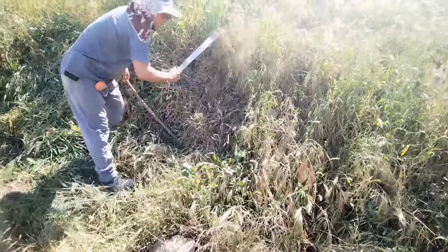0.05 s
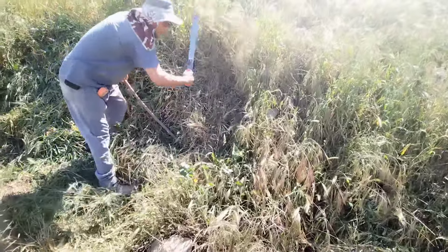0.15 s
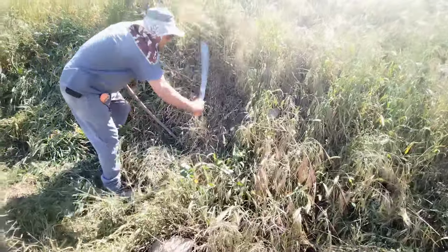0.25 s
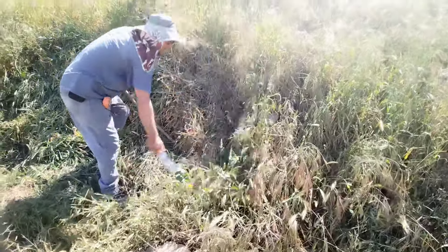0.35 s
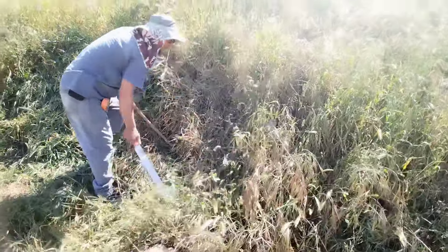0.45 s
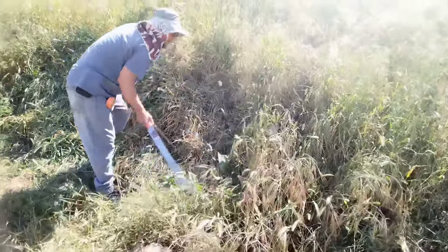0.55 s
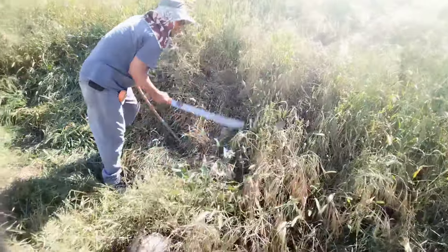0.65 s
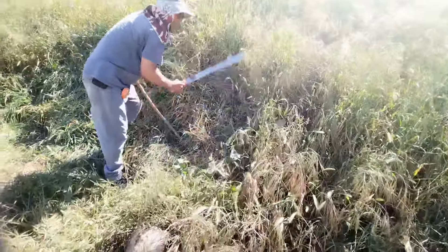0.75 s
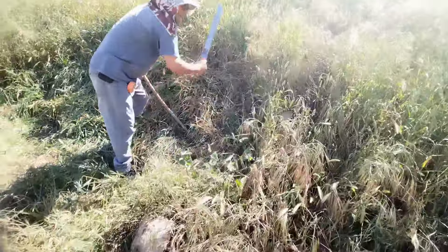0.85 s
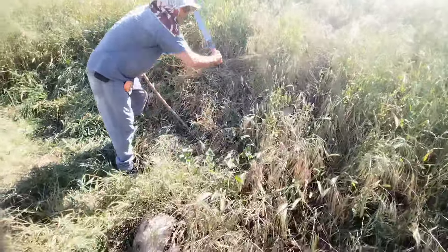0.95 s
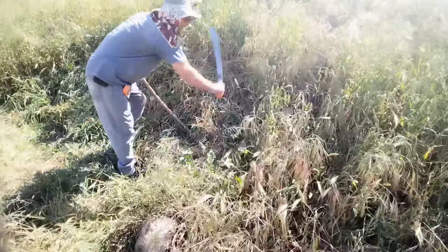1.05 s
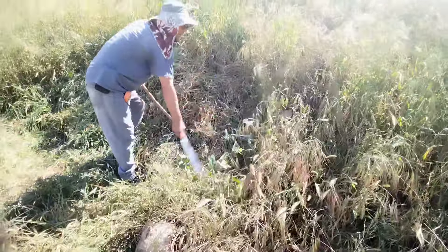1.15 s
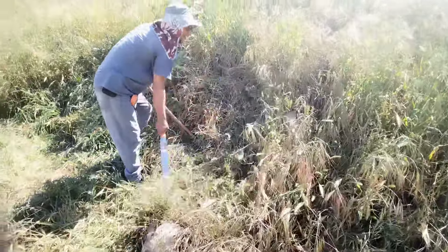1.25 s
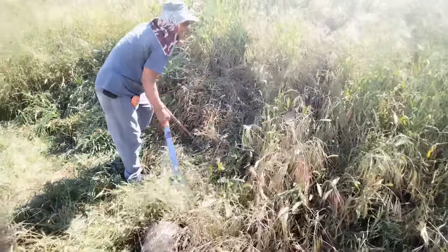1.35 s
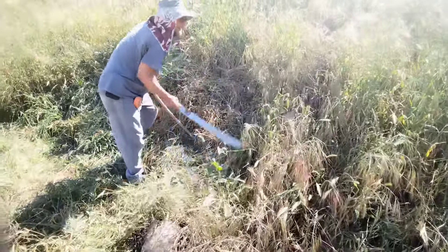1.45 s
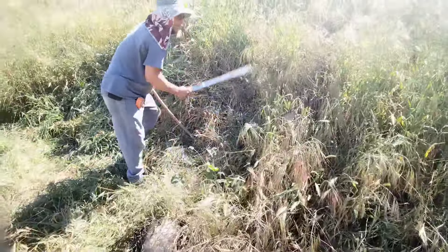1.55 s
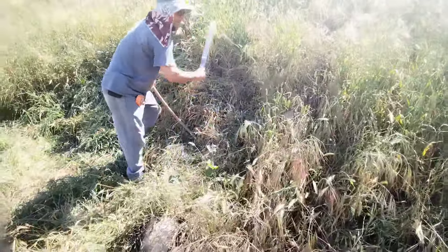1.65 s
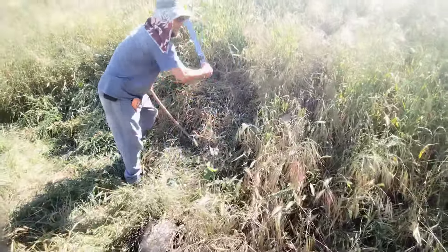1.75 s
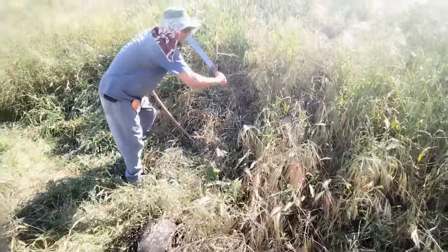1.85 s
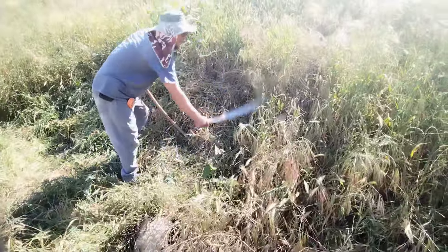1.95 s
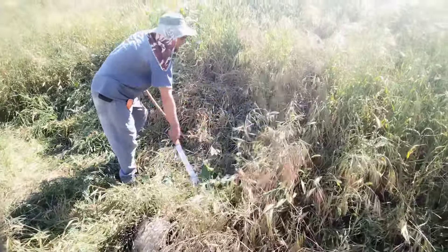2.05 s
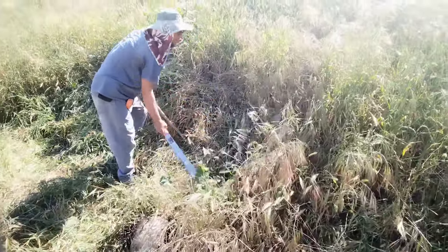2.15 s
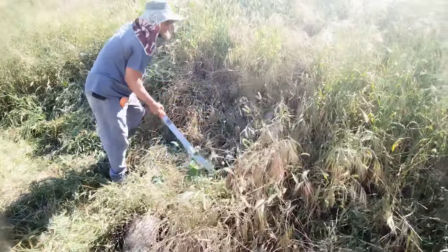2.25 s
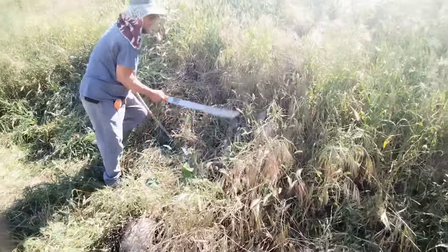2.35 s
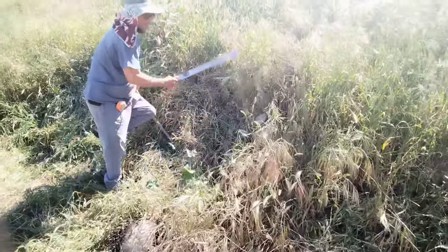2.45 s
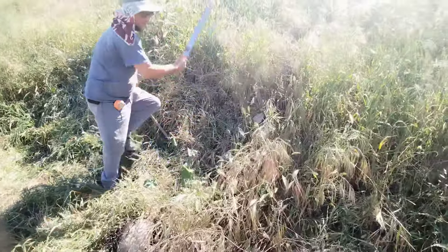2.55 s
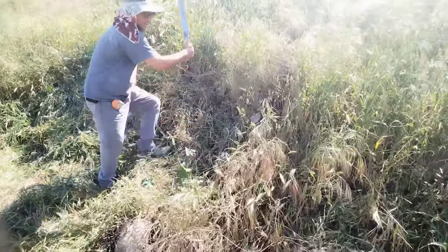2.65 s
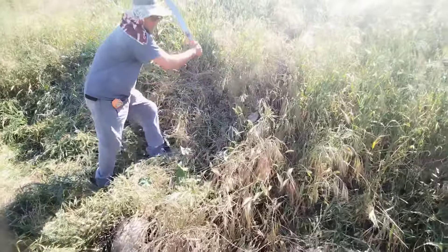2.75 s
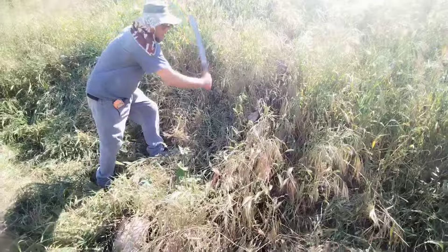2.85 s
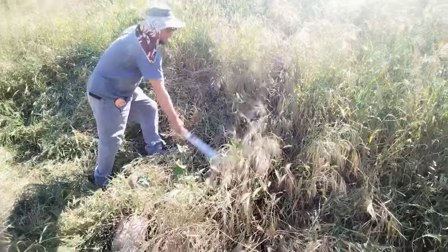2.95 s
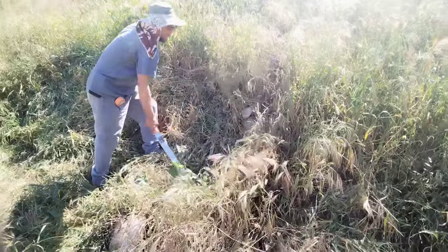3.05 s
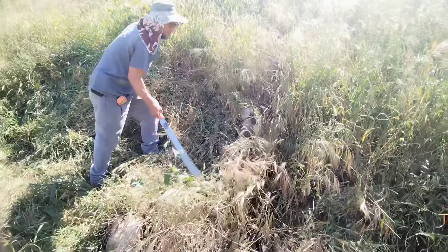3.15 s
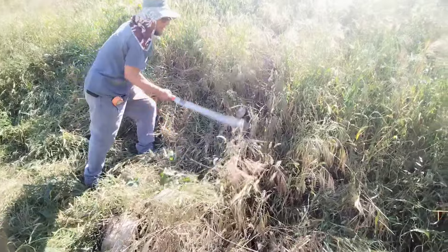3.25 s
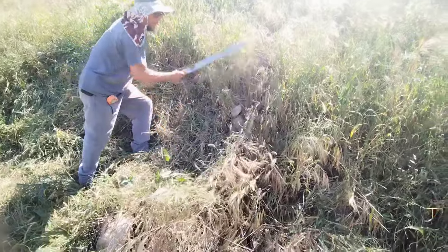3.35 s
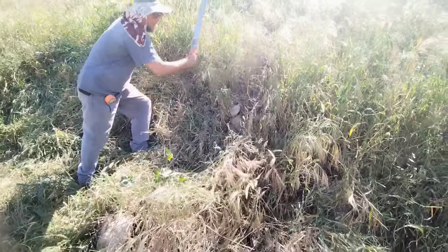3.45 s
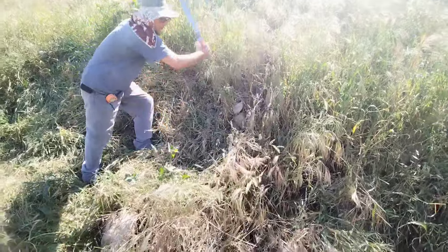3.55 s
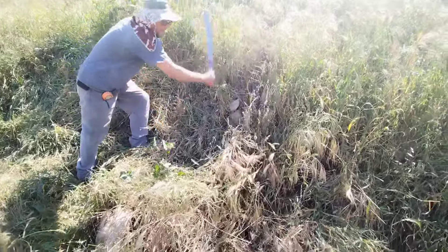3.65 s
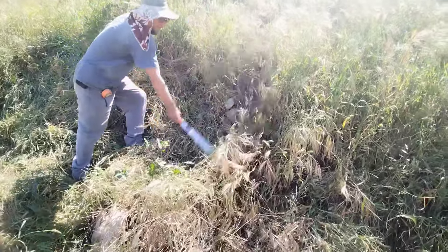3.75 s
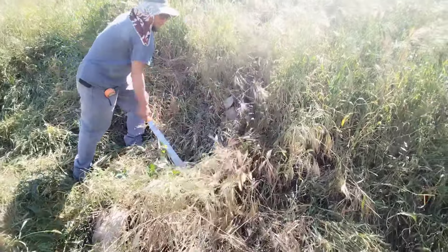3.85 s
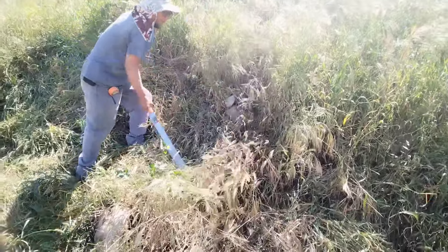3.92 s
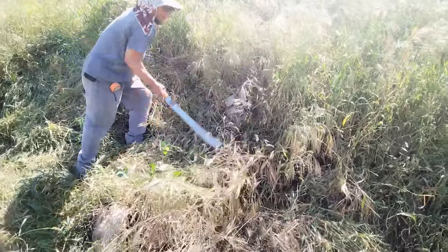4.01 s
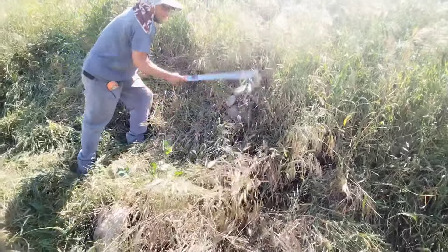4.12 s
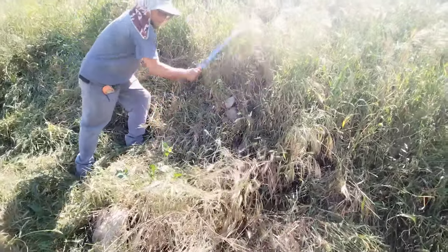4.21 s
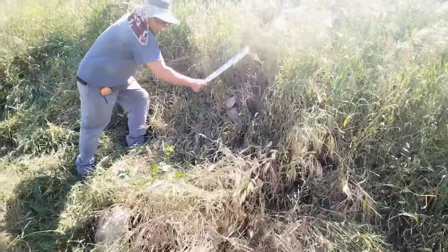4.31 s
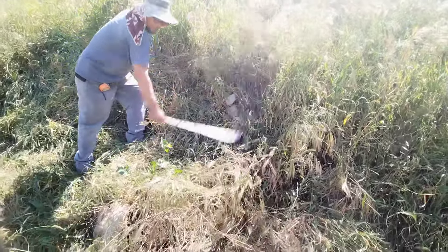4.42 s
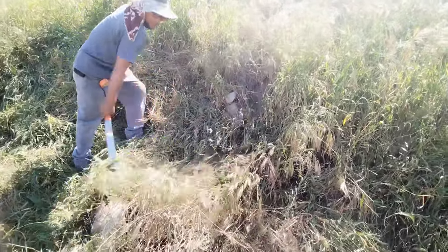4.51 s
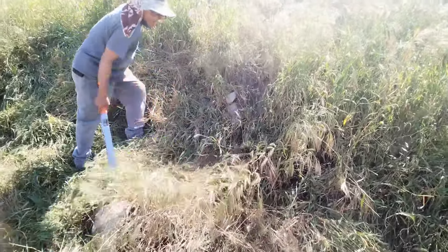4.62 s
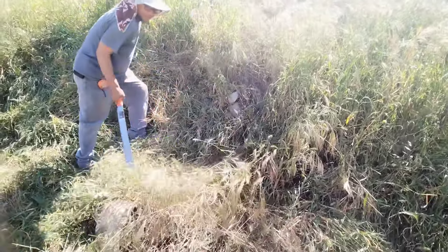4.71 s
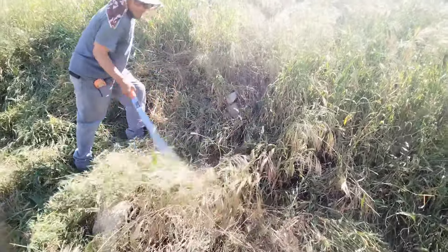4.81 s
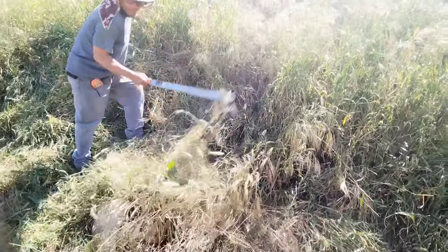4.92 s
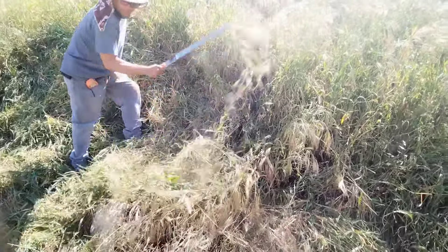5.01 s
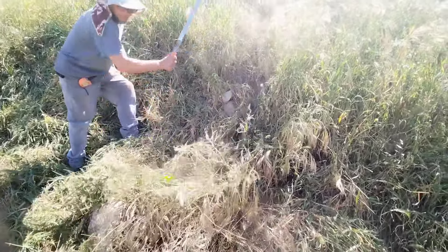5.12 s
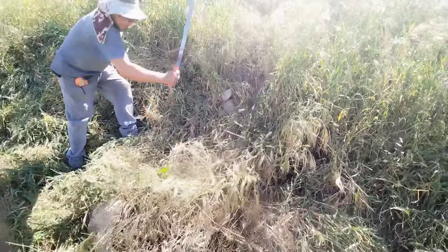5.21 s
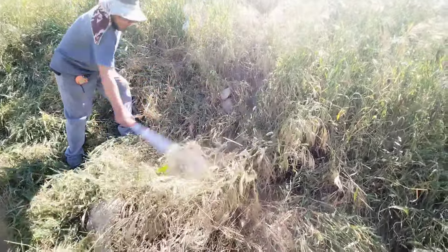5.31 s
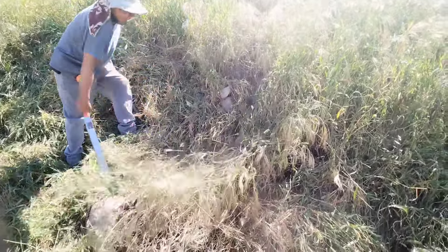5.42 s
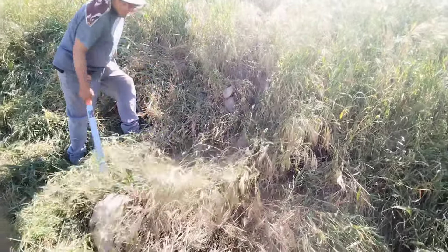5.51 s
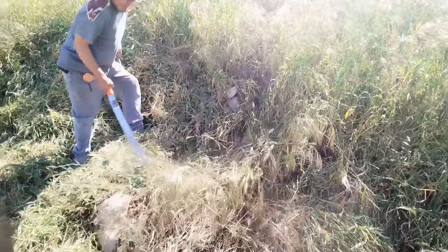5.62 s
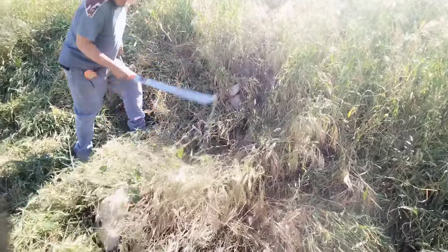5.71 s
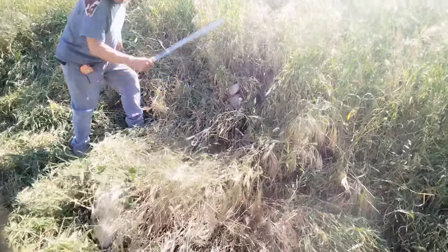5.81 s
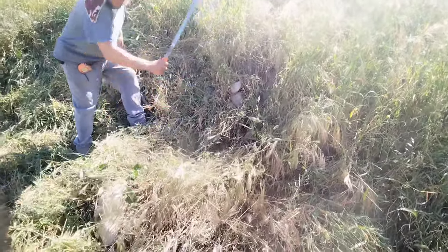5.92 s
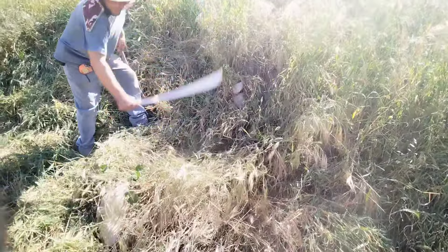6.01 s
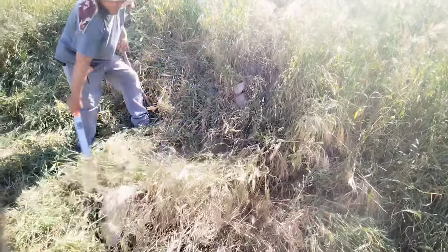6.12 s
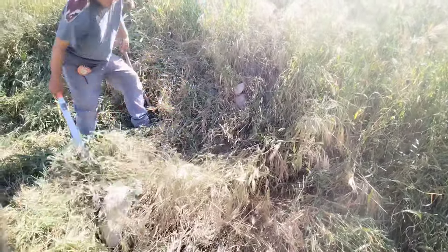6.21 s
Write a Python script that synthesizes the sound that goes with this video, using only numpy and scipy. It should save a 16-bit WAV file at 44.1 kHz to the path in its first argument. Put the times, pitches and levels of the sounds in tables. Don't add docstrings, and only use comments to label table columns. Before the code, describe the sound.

An open, dry field with a low, uneven distant traffic hum, growing slightly brighter toward the end. Grass already rustles at 0 s, with a crisp snap, and swishes again at 0.2. A quick bright cut lands at 0.37 s. Rustling peaks near 0.83 with a thin steel ring. A light flick at 1.15 leads straight into a firm crunchy cut at 1.19. Another firm cut comes at 2.0, with a dry stalk knock at 2.1. Rustle rises around 2.5 and 2.8 before a slower swelling cut at 2.96. A long swell bites at 3.75, with crackling stems. Near 4.1 to 4.2 s two soft footsteps thud while the blade rings high. The slowest, softer cut swells from 4.4 to 4.6, glinting metallically; stirred grass hisses at 4.9. A quick cut hits at 5.38, rustle follows at 5.7, and a loud, very short cut at 6.14 closes.

```python
import sys
import numpy as np
from scipy import signal
from scipy.fft import rfft, irfft
from scipy.io import wavfile
from scipy.ndimage import uniform_filter1d

SR = 44100
rng = np.random.default_rng(int(sys.argv[2]) if len(sys.argv) > 2 else 0)


def dump_mix(stems):
    frames = np.atleast_2d(stems).T
    limited = np.clip(frames, -1, 1)
    pcm = np.round(limited * 32767).astype(np.int16)
    wavfile.write(sys.argv[1], SR, pcm)


def linear_from_db(decibels):
    return 10 ** (np.asarray(decibels, float) / 20)


N = 276507

# (start [s], rise [s], hold [s], peak level [dB], cut stems settling afterwards [dB])
CUTS = [
    (0.374, 0.022, 0.053, -15, -57),
    (1.149, 0.0023, 0.0042, -26, -56),
    (1.1855, 0.019, 0.078, -14.5, -39),
    (2.003, 0.031, 0.077, -14.5, -39.5),
    (2.9565, 0.053, 0.051, -16, -40),
    (3.752, 0.078, 0.033, -14.5, -37),
    (4.399, 0.15, 0.036, -18.5, -32),
    (5.383, 0.032, 0.028, -14, -32),
    (6.143, 0.017, 0.015, -13, -31.5),
]
RELEASE_DB_PER_S = 388.5


def evened(x):
    return x / np.sqrt(np.mean(x ** 2) + 1e-20)


def read(points, hz):
    f, value = np.transpose(points)
    return np.interp(np.log(hz + 1), np.log(f + 1), value)


def add(mix, s, sound):
    part = mix[..., round(s * SR):][..., :sound.shape[-1]]
    part += sound[..., :part.shape[-1]]


def lumps(count, s):
    width = max(round(s * SR), 2)
    return evened(uniform_filter1d(uniform_filter1d(rng.standard_normal(count), width), width))


def ports(x, other, alike, lean_db, ahead):
    # (frequency [Hz], coherence [share])
    likeness = [(100, 0.99), (300, 1.17), (600, 1.16), (1000, 1.12), (1800, 1.1), (2800, 0.55),
                (4200, 0.26), (7200, 0.12), (10000, 0.04)]
    # (frequency [Hz], left minus right [dB])
    balance = [(500, -5), (1100, 0.5), (1800, 1.5), (2700, -14), (4200, -7.5), (5700, -9), (7200, -2.5),
               (9000, -7), (12000, -8)]
    hz = np.fft.rfftfreq(len(x), 1 / SR)
    same = np.clip(alike * read(likeness, hz), 0, 1)
    left = rfft(x)
    delayed = left * np.exp(-2j * np.pi * hz * ahead / SR)
    right = same * delayed + np.sqrt(1 - same ** 2) * rfft(other)
    lean = read(balance, hz) + lean_db / (1 + (hz / 10000) ** 6)
    return hz, np.array([left, right]) * linear_from_db(lean * np.array([[.5], [-.5]]))


def ring(db, hz, t60, rise, length):
    t = np.arange(round(length * SR)) / SR
    envelope = linear_from_db(db - 60 * t / t60) * (1 - np.exp(-t / rise))
    return envelope * np.sin(2 * np.pi * hz * t) * np.minimum((t[-1] - t) / 0.013, 1)


def traffic():
    # (time [s], rumble level [dB], tyre wash level [dB])
    hum_levels = [(0.0, -39.5, -67), (0.35, -41.5, -50), (0.61, -42, -76), (1.12, -42.5, -86),
                  (1.33, -41.5, -58), (1.62, -37, -73), (1.99, -44, -73), (2.22, -39, -58), (2.6, -40, -56),
                  (3.23, -40, -61.5), (3.6, -42, -69), (4.47, -37.5, -62.5), (4.92, -38.5, -59.5),
                  (5.26, -41.5, -71), (5.64, -39.5, -59), (6.11, -42.5, -65), (6.27, -41, -58)]
    # (frequency [Hz], density [dB per Hz])
    hum_colour = [(12, -48.5), (20, -46), (34, -76.5), (46, -9.5), (92, 0.5), (124, -11), (150, 0),
                  (249, -1.5), (283, -5), (384, -21), (420, -20), (550, -46), (920, -120)]
    # (frequency [Hz], width [Hz], level under the hum [dB])
    drone_lines = [(105.5, 13.5, -5.5), (142, 25, -6), (275, 1.4, -19.5)]
    # (time [s], gain above 230 Hz, twice lost below 55 Hz [dB])
    nearing = [
        (3.6, -1.5),
        (5.6, 4),
    ]
    duck_depth_db, duck_s, wash_gain_db = -7.5, 0.12, 2.5

    hz, z = ports(*rng.standard_normal((2, N)), alike=.8, lean_db=7.5, ahead=-9)
    x = evened(irfft(z * linear_from_db(read(hum_colour, hz)), N))
    for line_hz, width, db in drone_lines:
        x = x + linear_from_db(db) * evened(irfft(z / (1 + ((hz - line_hz) / width * 2) ** 2), N))

    s, level_db, wash_db = np.transpose(hum_levels)
    t = np.arange(N) / SR
    since = t - np.array([start + rise for start, rise, *_ in CUTS])[:, None]
    creeping_back = np.exp(-(np.maximum(since, 0) / duck_s) ** 2)
    duck_db = duck_depth_db * (np.clip(since / 0.067, 0, 1) * creeping_back).max(0)

    near_db = np.interp(t, *np.transpose(nearing))
    upper = irfft(rfft(x) / (1 + (230 / (hz + 1)) ** 6), N)
    lower = irfft(rfft(x) / (1 + (hz / 55) ** 6), N)
    x = x + (linear_from_db(near_db) - 1) * upper + (linear_from_db(-2 * near_db) - 1) * lower
    x = evened(x) * linear_from_db(np.interp(t, s, level_db) + 3 + duck_db + lumps(N, 0.012))
    wash = evened(irfft(z / (1 + ((hz - 680) / 190) ** 6), N))
    return x + wash * linear_from_db(wash_gain_db + np.interp(t, s, wash_db) + 1.8 * lumps(N, 0.03))


def rustle():
    # (peak time [s], hiss level [dB], swell [dB per s],
    # fade [dB per s], coarse stalks relative to hiss [dB])
    stirs = [(0.0, -30.5, 100, 43, -20), (.21, -29, 68, 34, -14.5), (.70, -35.5, 21, 55, -17),
             (0.828, -29, 196, 132, -19.5), (.95, -59, 100, 79, -35.5), (1.46, -35, 72, 57, -18.5),
             (1.628, -33, 194, 150, -17.5), (1.78, -39, 49, 167, -12), (2.36, -39.5, 41.5, 44, -14),
             (2.48, -31, 65.5, 51, -18.5), (2.789, -27.5, 58.5, 284, -18), (2.88, -59, 100, 80, -4.5),
             (3.25, -36, 67, 81, -29), (3.401, -33, 116, 132, -19), (3.495, -39, 60, 190, -21),
             (4.03, -37, 58, 34, -21), (4.18, -34, 68, 32, -20), (4.30, -36, 48, 150, -15),
             (4.9, -29, 40, 62.5, -22), (5.171, -44.5, 59, 67, -32), (1.025, -50, 150, 144, -7),
             (3.74, -58, 65, 201, -28.5), (5.732, -30.5, 73, 133, -22.5), (5.9, -44.5, 63, 65, -34)]
    still_db, still_coarse_db = -60, -23
    thin_out = 0.097
    middle_db, middle_lingers = -13, 0.049
    settle_s, settle_db_per_s, settle_coarse_db = 0.03, 50.5, -15

    t = .032 + np.arange(3115) / 500
    settling = [(s + rise + hold + settle_s, db, RELEASE_DB_PER_S, settle_db_per_s, settle_coarse_db)
                for s, rise, hold, _, db in CUTS]
    s, db, swell, fade, coarse_db = np.transpose([*stirs, *settling])[:, :, None]
    away = -swell * np.maximum(s - t, 0) - fade * np.maximum(t - s, 0)
    hiss = linear_from_db(2 * still_db) + linear_from_db(2 * (db + away)).sum(0)
    stalks = linear_from_db(2 * (db + coarse_db + (1.5 + thin_out) * away)).sum(0)
    coarse = linear_from_db(2 * (still_db + still_coarse_db)) + stalks
    hiss_db = 10 * np.log10(hiss)
    middle = middle_db - middle_lingers * (hiss_db + 37.5)
    return np.transpose([t, hiss_db, 10 * np.log10(coarse / hiss), middle])


def tuft_patches(x, patchy_db):
    spectra = signal.stft(x, nperseg=256, noverlap=192)[2]
    patches = rng.standard_normal(spectra.shape[:0:-1]).T
    patches = uniform_filter1d(uniform_filter1d(patches, size=3, axis=0), size=20, axis=1)
    patches = linear_from_db(patchy_db * evened(patches))
    shade = rng.standard_normal(spectra.shape[:0:-1]).T
    shade = evened(uniform_filter1d(uniform_filter1d(shade, size=50, axis=1), size=50, axis=1))
    patches = patches * linear_from_db(2.1 * shade / (1 + (np.arange(129)[:, None] / 11) ** 4))
    patches = patches / np.sqrt((patches ** 2).mean(0))
    return signal.istft(spectra * patches, nperseg=256, noverlap=192)[1][:, :x.shape[1]]


def grass(rows, place, colour, lump_db, crack_db, cracks_per_s, patchy_db, scrape_db, edge, alike):
    # (frequency [Hz], width [Hz], level [dB])
    scrape_modes = [(2297, 29, -3), (2720, 14, -4.5), (3200, 33, -10), (3455, 20, -7.5), (4944, 36, -9.5),
                    (5040, 24, -9.5), (5330, 53, -7), (5710, 36, -6), (6000, 34, -8.5), (6760, 33, -11),
                    (7100, 20, -7), (7360, 40, -4.5), (7810, 120, -12)]
    # (time [s], level above 11 kHz over the usual [dB])
    dryness = [(0, 3), (.5, -2), (.8, 3), (1.1, 2.5), (1.5, -0.5), (1.8, -4), (2.3, 3), (2.7, 1.5),
               (3.1, -1), (3.5, 1), (3.8, 1), (4.25, 2), (4.5, 4), (4.8, -2), (5.4, -2), (6.2, 0)]
    crisp_db = -5

    s, *columns = np.transpose(rows)
    t = s[0] - edge + np.arange(round((s[-1] - s[0] + .05) * SR)) / SR
    hiss_db, coarse_db, middle_db = (np.interp(t, s, c) for c in columns)
    n = len(t)
    crack_sizes = None
    cracks = (rng.random(n) < cracks_per_s / SR) * linear_from_db(crack_db * np.minimum(rng.exponential(1, n), 3))
    clumps = linear_from_db(lump_db * lumps(n, 0.0082)) * (1 + uniform_filter1d(cracks, size=16) * 12)
    clumps = clumps / np.sqrt(uniform_filter1d(clumps ** 2, size=1000))

    hz, z = ports(*clumps * rng.standard_normal((2, n)), alike, *place)
    steel = sum(linear_from_db(db + scrape_db) / (1 + 2j * (hz - f) / width) for f, width, db in scrape_modes)
    z = z * linear_from_db(read(colour, hz)) * (1 + steel)

    coarse_band = 1 / (1 + (hz / 2100) ** 20)
    fine_band = 1 / (1 + (4200 / (hz + 1)) ** 12)
    middle_band = (1 - coarse_band) * (1 - fine_band)
    fine, coarse, middle = (evened(irfft(z * band, n).T).T for band in (fine_band, coarse_band, middle_band))
    crisp_band = 1 / (1 + (11000 / (hz + 1)) ** 8)
    crisp_gain = linear_from_db(crisp_db + np.interp(t, *np.transpose(dryness)))
    fine = fine + (crisp_gain - 1) * irfft(rfft(fine) * crisp_band, n)
    x = tuft_patches(fine + linear_from_db(coarse_db) * coarse + linear_from_db(middle_db) * middle, patchy_db)
    fade = np.clip(np.minimum((t - t[0]) / .001, (t[-1] - t) / .015), 0, 1)
    return max(t[0], 0), (x * linear_from_db(hiss_db + 3.0) * fade)[:, t >= 0]


def soil(x):
    # (time [s], dip frequency [Hz], dip depth [dB], shade near 500 Hz [dB])
    echo_dips = [(0, 600, 0, 0.5), (.55, 600, 1, 2), (.65, 650, -10, -12), (.8, 700, 3, -8),
                 (.9, 1150, -12, -5), (1.08, 1140, -15, -10), (1.3, 1200, 5, 3), (1.52, 1250, -12, 2),
                 (1.68, 750, -13, -2), (1.82, 950, -12.5, 1.5), (2.2, 1000, 0.5, 3), (2.55, 1010, -3, -0.5),
                 (3.3, 1100, -6, -1), (3.6, 2160, -7, -6), (4.05, 1010, -9, 5.5), (4.5, 1060, -1, -6.5),
                 (5.15, 1060, -6, -3), (5.9, 1310, -4, -2)]
    dip_width = 0.12
    hz, t, z = signal.stft(x, SR, nperseg=1024, noverlap=512)
    s, dip_hz, depth_db, shade_db = np.transpose(echo_dips)
    off = (hz[:, None] / np.interp(t, s, dip_hz) - 1) / dip_width
    shade = np.exp(-((hz[:, None] - 500) / 150) ** 2)
    z = z * linear_from_db(np.interp(t, s, depth_db) * np.exp(-off ** 2) + np.interp(t, s, shade_db) * shade)
    return signal.istft(z, nperseg=1024, noverlap=512)[1][:, :N]


def stems():
    # (time [s], peak level [dB], pitch [Hz])
    snaps = [(0.0024, 3, 8100), (0.162, -9, 6750), (0.2127, -6.5, 6980), (0.342, -9, 5500),
             (0.3476, 0.5, 6980), (0.4507, 9.5, 7400), (0.8764, -12, 7500), (1.251, 3, 7300),
             (1.607, -13, 7550), (1.854, -19.5, 6900), (1.9136, -23, 5600), (1.941, -15.5, 6140),
             (2.0444, -16, 7340), (2.0804, -4, 7270), (2.0914, -11, 7200), (3.0659, 0, 5230),
             (3.361, -12, 5600), (3.339, -17, 7000), (4.054, -15, 5500), (1.122, -28, 3500),
             (0.3296, -8, 3500), (3.4062, -9, 6700), (3.7406, -17, 7300), (3.7988, -1.5, 7900),
             (3.8087, -14, 7350), (3.8347, 1, 7100), (4.0881, -12, 5700), (4.141, -8, 5500),
             (6.1694, -8, 6800)]
    # (time [s], peak level [dB], pitch [Hz], t60 [s])
    knocks = [
        (0.667, -28.5, 1020, 0.018),
        (1.249, -24, 1500, 0.03),
        (2.104, -1, 1890, 0.011),
        (2.295, -28, 920, 0.018),
        (4.357, -33, 697, 0.058),
    ]
    out, t = np.zeros((2, N)), np.arange(1500) / SR
    for s, db, hz in snaps:
        puff = rng.standard_normal((2, len(t))) * linear_from_db(-60 * t / 0.0091) * (1 - np.exp(-t / 0.00029))
        band = signal.butter(1, [hz * 0.79, min(hz * 1.0, 14000)], "band", fs=SR)
        add(out, s, linear_from_db(db - 3.5) * signal.lfilter(*band, puff + 0.37 * puff[0]))
        add(out, s, linear_from_db(db - 30.5 - 60 * t / .008) * np.diff(puff + puff[0], prepend=0))
    for s, db, hz, t60 in knocks:
        add(out, s, ring(db, hz, t60, 0.65 / hz, 0.051) * linear_from_db(np.array([[1.5], [-1.5]])))
    return out


def stroke(start, rise, hold, peak_db, coarse_db):
    # (time [s], jump [dB], time to die away [s])
    tufts = [(.380, 2.5, .005), (.387, 2, .004), (.394, 1.5, .004), (.4025, 4, .006), (.412, 2, .006),
             (.441, 4.5, .004), (.4555, -3, .01), (1.186, 4, .01), (1.2035, 1, .006), (1.214, 3, .005),
             (1.222, 2, .008), (1.2415, 3, .003), (1.257, -4, .04), (1.297, 4, .003), (2.005, -1, .012),
             (2.019, 3.5, 0.0092), (2.042, 0, 0.0044), (2.036, 0.5, .004), (2.079, 2, .004),
             (2.09, 4, .004), (2.095, -5, 0.0089), (2.106, 3, .008), (2.122, -3.5, 0.014),
             (2.957, -5, .016), (2.9745, 2.5, .01), (3.005, 2, 0.014), (3.024, -2, .008),
             (3.038, 3.5, .005), (3.066, 2, .008), (3.7525, -3.5, .01), (3.7648, 1, .005), (3.773, 1, .006),
             (3.798, 3, .005), (3.808, 3.5, .007), (3.822, 3, .005), (3.834, 3, 0.0062), (3.857, 2, .005),
             (3.867, 3.5, .008), (4.42, 4, .01), (4.515, 1.5, .015), (4.536, -6, 0.0093),
             (4.545, 4.5, 0.013), (4.577, 1.5, .008), (5.382, -3.5, 0.013), (5.396, 1, 0.0069),
             (5.414, 1, .008), (5.44, 1, .01), (6.148, -3, .004), (6.1535, 3, .008), (6.165, 3, .006),
             (6.1715, -4, .003), (6.19, 3, .015)]
    entry_db, rise_bend, sag_db, surge_db = -21.5, 0.5, -4.5, 1
    bite_db, bite_s = 6, 0.0034
    soft_rise_s = 0.05
    tips_db, middle_db = -11.5, -10
    coarse_stop_db_per_s = 193.5

    t = np.arange(260) / 1000
    into, through = np.clip(t / rise, 0, 1), np.clip((t - rise) / hold, 0, 1)
    swell_db = peak_db + entry_db * (1 - into ** rise_bend)
    cracking_db = bite_db * np.exp(-t / bite_s - (rise / soft_rise_s) ** 2)
    leaving_db = RELEASE_DB_PER_S * np.maximum(t - rise - hold, 0)
    hiss_db = swell_db + cracking_db + sag_db * through - leaving_db

    s, jump_db, dies = np.transpose(tufts)[:, :, None]
    since = start + t - s
    hiss_db = hiss_db + (jump_db * (since >= 0) * np.exp(-(np.maximum(since, 0) / dies) ** 2)).sum(0)
    surges = rng.standard_normal((3, len(t)))
    surges = surge_db * evened(uniform_filter1d(uniform_filter1d(surges, size=8), size=8))
    coarse_db = coarse_db + tips_db * (1 - 0.66 * into - 0.34 * through)
    coarse_db = coarse_db - coarse_stop_db_per_s * np.clip(t - rise - hold, 0, .06)
    return np.transpose([start + t, hiss_db + surges[0], coarse_db + surges[1], middle_db + surges[2]])


def blade():
    # (frequency [Hz], t60 [s])
    bending_modes = [(2280, 0.73), (2697, 0.47), (3074, 0.77), (3445, 0.12)]
    # (time [s], level [dB], favoured mode [index, may lie beyond 0-3], loss per mode away from
    # it [dB], time until the grass damps it [s])
    touches = [(.792, -28, 1.5, 21, 0.014), (.819, -24, 0.85, 14.5, .32), (1.418, -50, 0.5, 4, .18),
               (1.627, -32.5, 1, 6, 0.057), (1.7, -45, 5, 1, .25), (2.451, -37.5, 1.5, 6, 0.15),
               (2.55, -28, -2.5, 2.5, 0.12), (2.87, -49.5, -3, 3.5, .098), (3.28, -42.5, .3, 8, .09),
               (3.361, -36, 2.5, 11, 0.033), (3.49, -41.5, 1, 11, 0.2), (3.948, -29.5, -1, 12, .26),
               (4.08, -38, 1, 10, 0.064), (4.141, -20.5, 4, 5, 0.098), (4.206, -28, .3, 8, 0.04),
               (4.415, -30, 2.1, 11.5, 0.18), (4.474, -28, -2.5, 5, 0.047), (4.508, -24.5, 0.5, 17, 0.05),
               (5.166, -47, 2, 8, 0.073), (5.703, -42, 0.5, 2.5, 0.082), (2.66, -44, 0, 11, 0.19)]
    # (time [s], level [dB], frequency [Hz],
    # t60 [s])
    pings = [(.82, -21.5, 7200, 0.21), (.82, -40, 5200, .3), (1.152, -25.5, 2777, 0.42),
             (1.152, -32, 3128, 0.44), (1.21, -16, 3580, 0.093), (2.53, -31, 5100, 0.24),
             (2.575, -29.5, 5670, 0.44), (2.97, -33, 2990, 0.43), (3.066, -14, 4940, 0.059),
             (4.088, -26, 7000, 0.18), (4.088, -30.5, 5660, 0.56), (4.088, -31.5, 5140, 0.35),
             (4.141, -28, 5000, 0.12), (4.141, -28, 7150, 0.19), (4.21, -22, 6670, 0.087),
             (4.445, -22, 7240, 0.13), (4.491, -26, 8300, .15), (4.52, -5, 6740, 0.065),
             (5.395, -13.5, 2263, 0.061), (2.0098, -21, 2600, 0.1), (2.02, -17, 2900, .08),
             (4.51, -25, 2300, .2), (4.42, -31, 3100, .3), (0.81, -40, 2275, 0.98), (6.205, -27, 3700, .06),
             (4.46, -27, 3100, .1), (4.472, -32, 3096, 0.28), (4.505, -28, 3900, .12),
             (4.431, -24, 6750, .12), (4.088, -34, 6340, 0.33), (4.09, -27, 6020, .3),
             (4.141, -39, 3870, 0.61), (4.485, -26, 7900, .2), (3.49, -33, 5450, 0.17),
             (.403, -11, 7900, .1), (3.004, -6, 7380, 0.16), (1.204, -17, 7420, .1), (4.49, -27, 7960, .3),
             (4.088, -34, 6720, .15), (3.361, -32, 5250, .2), (3.361, -35, 4780, 0.22),
             (3.405, -32, 7200, 0.093), (3.026, -17, 3050, 0.034), (4.546, -24, 7200, .1)]
    out = np.zeros(N)
    for s, touch_db, favoured, lost_db, free in touches:
        mode_db = touch_db - lost_db * abs(np.arange(len(bending_modes)) - favoured)
        modes = sum(ring(db, hz, t60, .0015, .6) for db, (hz, t60) in zip(mode_db, bending_modes))
        held = np.maximum(np.arange(len(modes)) / SR - free, 0)
        add(out, s, modes * linear_from_db(-60 * held / .08))
    for s, db, hz, t60 in pings:
        add(out, s, ring(db, hz, t60, 0.0021, min(t60 / 2, .3)))
    out = out * linear_from_db(2.95 * lumps(N, 0.027))
    return np.array([linear_from_db(-7.5) * np.roll(out, 3), linear_from_db(4.5) * out])


def footsteps(field):
    # (time [s], level [dB], pitch [Hz], t60 [s])
    thuds = [
        (4.109, -6, 152, 0.027),
        (4.198, -12, 169, 0.021),
    ]
    for s, db, hz, t60 in thuds:
        thud = np.convolve(ring(db, hz, t60, 0.0028, .1), np.hanning(120) / 60)
        add(field, s, thud * linear_from_db(np.array([[1.2], [-1.2]])))


def scene():
    # (frequency [Hz], density [dB per Hz])
    rustle_colour = [(350, -19), (600, -12), (1520, -11.5), (1800, -7), (2110, -11.5), (2230, -9),
                     (2540, -8.5), (2860, -6.5), (2980, -5.5), (3270, -6.5), (4310, -10.5), (5550, -9.5),
                     (6860, -2), (10300, -14), (14200, -11.5)]
    # (frequency [Hz], density [dB per Hz])
    stroke_colour = [(88, -50), (150, -4), (436, -14), (801, -8.5), (1500, -14), (2000, -8.5), (2280, -9),
                     (2510, -10.5), (2760, -6), (4200, -11.5), (4800, -10), (6380, -8), (7290, -1.5),
                     (10300, -16), (14200, -13.5)]
    # (lean to the left [dB], lead at the left [samples],
    # coarse stalks relative to hiss [dB])
    places = [(4.5, 0.5, -12.5), (1, 4, -19.5), (7.5, -5, -14), (5.5, 1.5, -12.5), (4, -5, -17.5),
              (4, 1, -12.5), (6, 5, -15), (7.5, 6, -12), (10, 7.5, -11)]
    singing_db = [10.7, 7.8, 7.9, 8.5, 8.6, 7.3, 8, 4.4, 9.1]

    out = stems() + blade()
    field = traffic()
    footsteps(field)
    add(field, *grass(rustle(), (0, 4), rustle_colour, lump_db=-0.5, crack_db=1.0, cracks_per_s=120,
                      patchy_db=1.94, scrape_db=7.5, edge=.035, alike=0.53))
    out = out + soil(field)
    for (*swing, _), (*place, coarse_db), sing_db in zip(CUTS, places, singing_db):
        add(out, *grass(stroke(*swing, coarse_db), place, stroke_colour, lump_db=0.5, crack_db=1.0,
                        cracks_per_s=400, patchy_db=3.0, scrape_db=sing_db, alike=0.8, edge=.0003))
    return out


def masked_bands(x, quiet_db, masked_db, depth_db):
    hz, _, z = signal.stft(x, SR, nperseg=1024, noverlap=768)
    hz, power = hz[:, None], uniform_filter1d((abs(z) ** 2).mean(0), size=4, axis=1)
    band = power[:512].reshape(128, 4, -1).mean(1)
    band = np.repeat(band, 4, axis=0)[np.minimum(np.arange(513), 511)]
    around = uniform_filter1d(power * np.minimum(hz / 1500, 1) ** 2, size=150, axis=0)
    limit = linear_from_db(2 * quiet_db) / (1 + (hz / 2700) ** 10)
    limit = limit + linear_from_db(2 * masked_db) * around * np.minimum(hz / 3500, 1) ** 3
    limit = limit * (1 + 3 / (1 + ((hz - 4150) / 220) ** 4) + 3 / (1 + ((hz - 11000) / 1200) ** 4))
    limit = limit + linear_from_db(-58) * power[52:76].max(0) / (1 + ((hz - 4150) / 230) ** 6)
    wander = np.repeat(rng.standard_normal((129, z.shape[2])), 4, axis=0)[:513]
    wander = evened(uniform_filter1d(wander, size=10, axis=1))
    dropped = 1. * (band < limit * linear_from_db(np.where(hz > 3000, 6, 14) * wander))
    dropped = uniform_filter1d(dropped, size=2, axis=1)
    loss_db = depth_db * np.where(hz > 3000, 1, 0.35) * (hz > 800) * dropped
    return signal.istft(z * linear_from_db(loss_db), nperseg=1024, noverlap=768)[1][:, :N]


def roll_off(x):
    return signal.sosfilt(signal.butter(12, 15610, fs=SR, output="sos"), x)


def record(dry):
    edge_hz = 14280
    held = .9 * np.tanh(dry / .9)
    x = masked_bands(held, quiet_db=-90.5, masked_db=-15, depth_db=-24)
    lowpass = signal.firwin(601, edge_hz, window=("kaiser", 8), fs=SR)
    low = signal.oaconvolve(x, lowpass[None], "same")
    sudden = np.zeros(N)
    for start, *_ in CUTS:
        add(sudden, start, np.hanning(240))
    mix = low + linear_from_db(-8) * sudden * (x - low)
    return roll_off(mix)


dry = scene()
out = record(dry)
dump_mix(out)
```